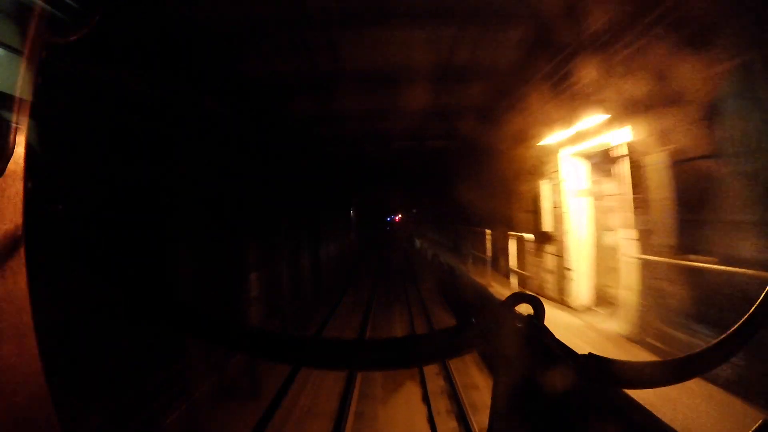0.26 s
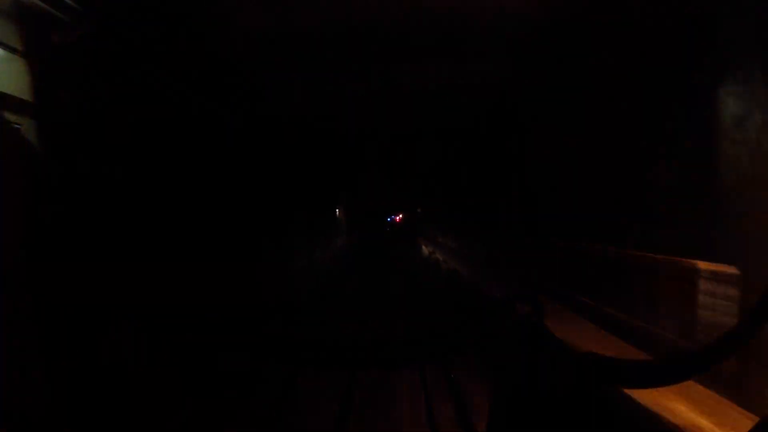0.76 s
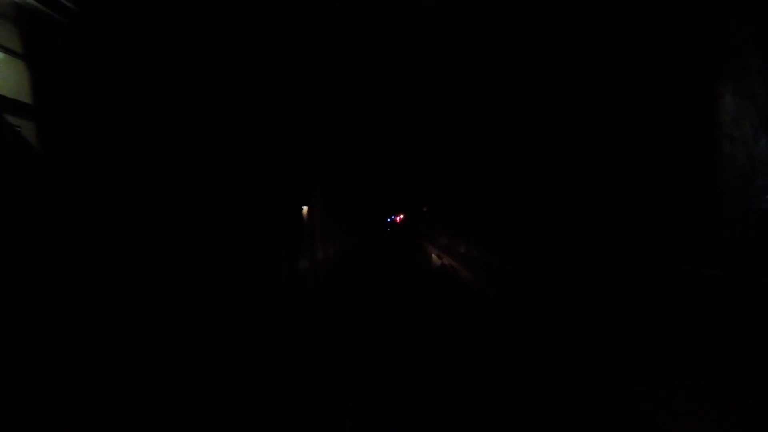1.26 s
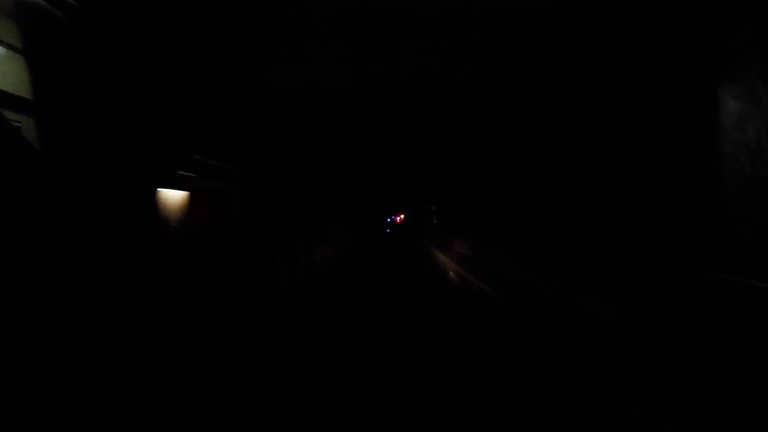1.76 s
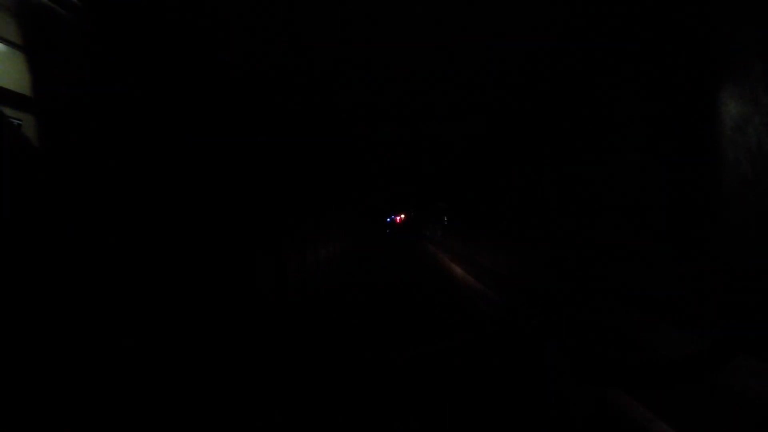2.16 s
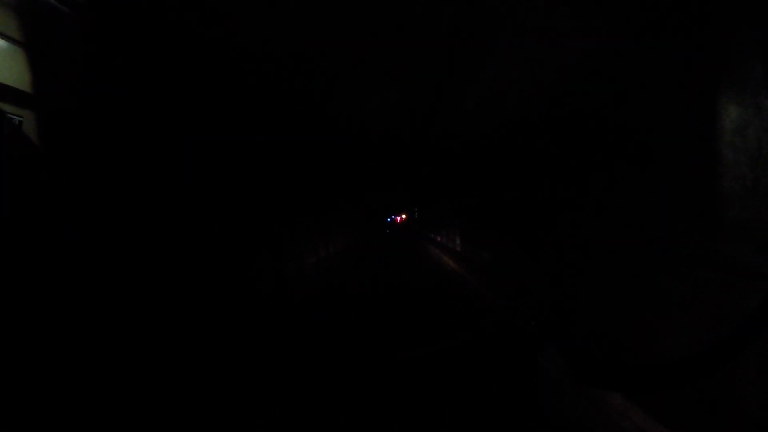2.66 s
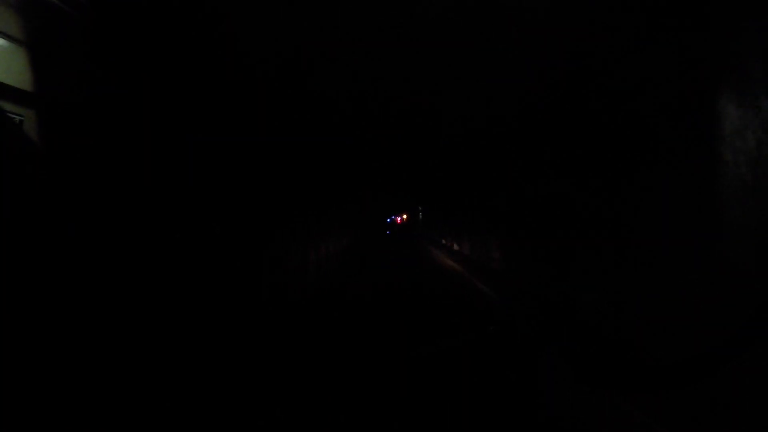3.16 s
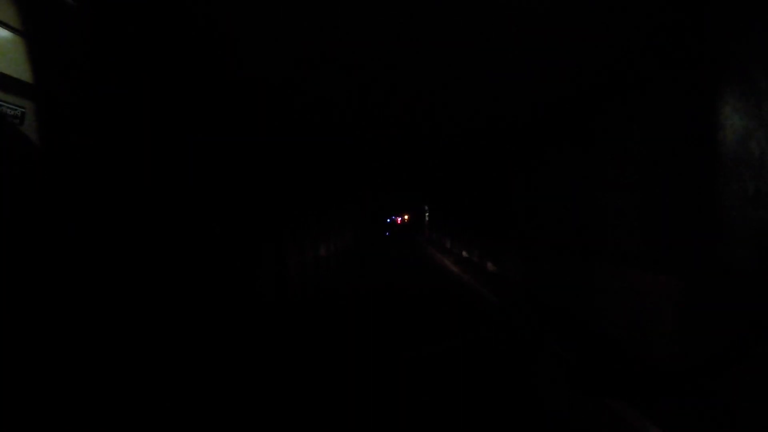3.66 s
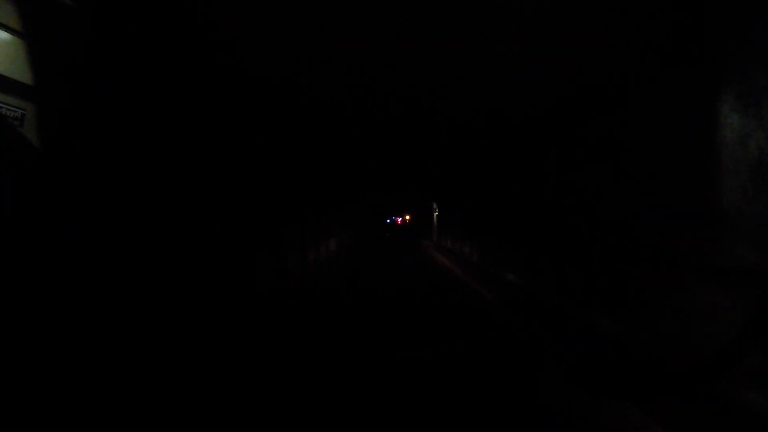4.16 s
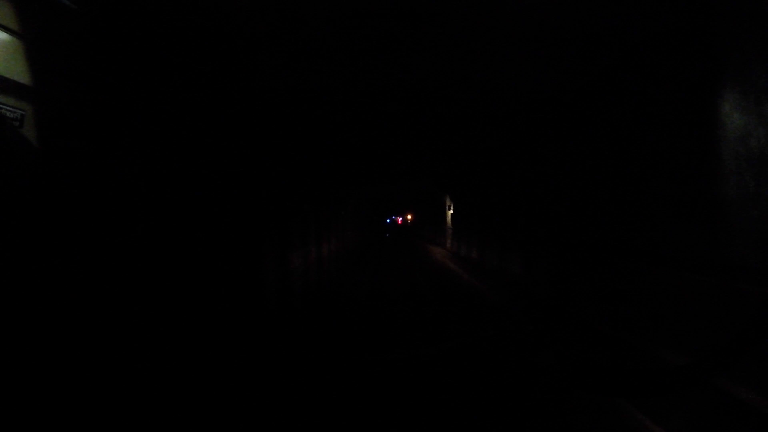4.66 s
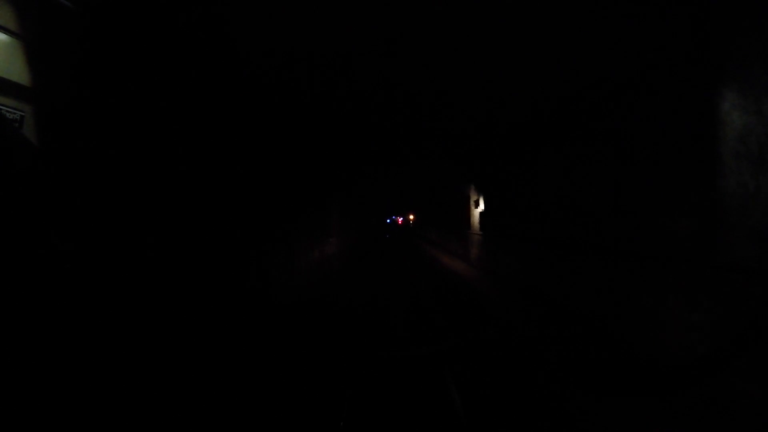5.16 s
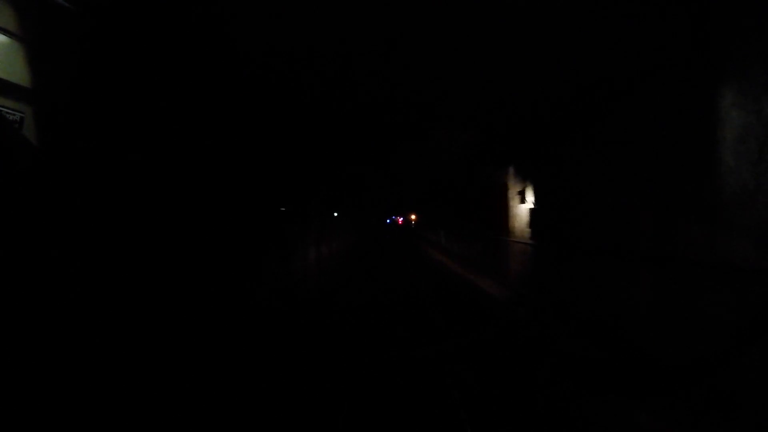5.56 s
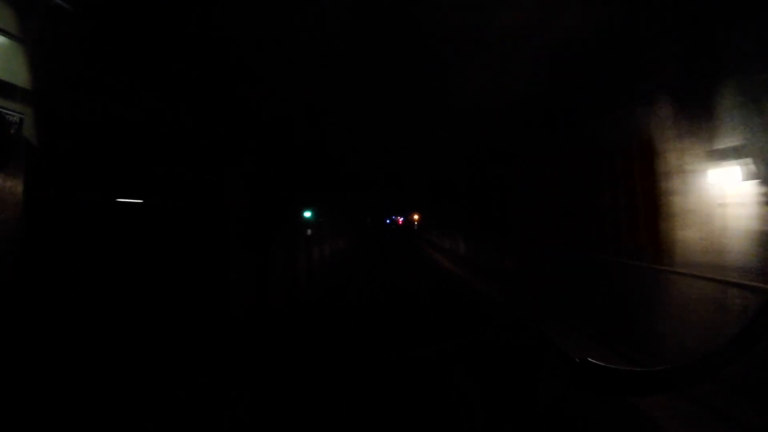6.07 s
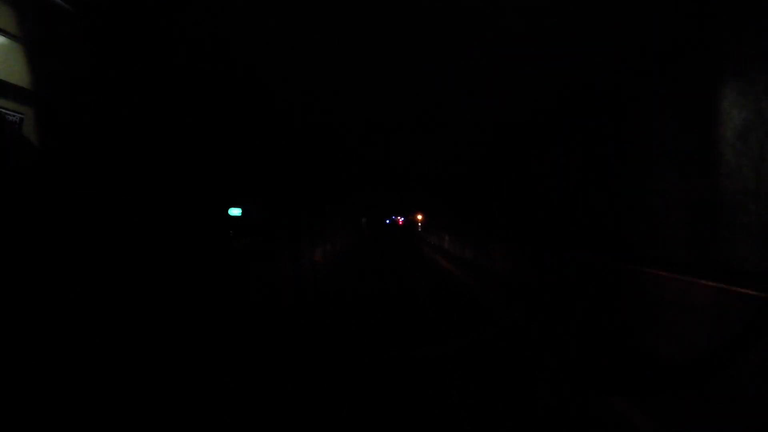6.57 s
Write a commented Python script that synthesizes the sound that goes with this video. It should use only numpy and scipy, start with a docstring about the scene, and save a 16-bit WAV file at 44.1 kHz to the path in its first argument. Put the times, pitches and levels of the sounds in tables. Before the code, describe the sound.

Heard from inside the cab of a subway train speeding up in a tunnel: deep rumble and hollow boom, dull irregular floor thumps, and a thin steady high whine with rising and falling motor tones around it. Wheels clatter heavily over two rail joints midway, then the sliding contact shoe clangs sharply over a gap. The speed then holds, roaring and hissing.

```python
"""The cab of a subway train gathering speed in a tunnel. From the start filtered noise makes the car body
rumble and boom, the wheels roar and the collector shoe hiss; a fixed sine whines at the inverter carrier while
its sidebands fan out with motor speed. Bumps thump, the shoe ticks and scrapes in short bursts. Near 3.1 s and
4.1 s the wheels crash over two rail joints, near 5.3 s the shoe clangs at a gap, and from 5.66 s the speed holds."""
import sys
import numpy as np
from scipy import signal
from scipy.fft import irfft, next_fast_len
from scipy.io import wavfile
from scipy.ndimage import map_coordinates

SR = 44100
rng = np.random.default_rng(int(sys.argv[2]) if len(sys.argv) > 2 else 0)


def transcribe(signal):
    """Save signal, clipped to [-1, 1], as a 16-bit WAV file at the path in sys.argv[1]."""
    frames = np.atleast_2d(signal).T
    limited = np.clip(frames, -1, 1)
    pcm = np.round(limited * 32767).astype(np.int16)
    wavfile.write(sys.argv[1], SR, pcm)


N = 300321
TIME = np.arange(N) / SR  # s

# motor speed, rising steadily and then held: time_s, stator_hz
STATOR_CURVE = [(0, 69.5), (5.66, 116.8), (6.81, 116.8)]
TOP_STATOR_HZ = 116.8
# bumps in the track: start_s, heave_db, panel_db, panel_pitch_hz, boom_db
TRACK_BUMPS = [(0.11, -38, -36, 170.2, -18.5), (0.73, -26.5, -24, 125, -43), (1.19, -24, -31, 125, -30),
               (1.42, -38, -42, 170, -13.5), (1.63, -33, -26, 135, -19.5), (2.22, -42, -29, 235, -19.5),
               (2.55, -28.5, -27, 105, -37), (2.94, -36, -34, 125, -21.5), (3.03, -26, -34, 124.7, -38),
               (3.51, -28, -20.5, 125, -36), (4.03, -25, -29, 90, -28), (4.31, -23, -26, 130, -34),
               (4.38, -30, -22.5, 120, -39), (4.86, -33, -23.5, 85, -28), (4.99, -25.5, -27, 110, -15),
               (5.5, -36, -23, 110, -36), (6.17, -41, -25, 195, -36)]
# one axle over a rail joint: start_s, crash_db, thud_db, rise_s, crash_t60_s
AXLE_BLOWS = [(3.125, -35, -32.5, .08, 1.45), (3.36, -36, -24, .075, 0.95),
              (4.138, -34.5, -25.5, .022, 1.3), (4.355, -36.5, -26, .09, 0.5)]
# spectrum of steel struck at a joint: frequency_hz, density_db (per Hz)
CRASH_SPECTRUM = [(200, -1), (500, 6.5), (900, 3), (1400, -4.5), (2100, -4.5), (3000, -12), (5000, -22.5),
                  (9000, -39)]
# spectrum of the shoe catching or grazing: frequency_hz, density_db (per Hz)
SHOE_SPECTRUM = [(1500, -19.5), (3300, -5), (4150, -8), (4800, 2.5), (5500, 2.5), (6000, -1), (6600, -2),
                 (7400, -7), (8800, -10), (10000, -19)]


def amp(db):
    """Converts decibels to an amplitude ratio."""
    return 10 ** (np.asarray(db) / 20)


def unit(x):
    """Normalizes a signal to rms 1."""
    return x / np.sqrt(np.mean(x ** 2) + 1e-20)


def follow(rows):
    """Linear interpolation: each column of a curve table at every sample."""
    s, *columns = np.transpose(rows)
    return [np.interp(TIME, s, column) for column in columns]


def noise(shape):
    """Spectral shaping: random Fourier coefficients weighted by shape(Hz) give Gaussian noise of rms 1."""
    size = next_fast_len(N)
    hz = np.arange(size // 2 + 1) * SR / size
    coefficients = rng.standard_normal(2 * len(hz)).view(complex)
    return unit(irfft(coefficients * shape(hz), size)[:N])


def coloured(points):
    """Coloured noise: a spectrum given as (Hz, dB), with a further fall of 12 dB per octave above the last point."""
    at, db = np.transpose(points)

    def shape(hz):
        level_db = np.interp(np.log(hz + 1), np.log(at), db)
        return amp(level_db) / np.maximum(hz / at[-1], 1) ** 2

    return noise(shape)


def ring(centre_hz, half_width_hz):
    """Random excitation of a resonance: noise in a narrow band, at half amplitude half_width_hz off centre."""
    return noise(lambda hz: 1 / (1 + ((hz - centre_hz) / half_width_hz) ** 2))


def waver(rate):
    """Smooth random modulation of rms 1: a spline through rate random knots per second."""
    knots = rng.standard_normal(4096)
    coarse = TIME[::16]
    curve = map_coordinates(knots, [coarse * rate], order=2, mode="wrap")
    return unit(np.interp(TIME, coarse, curve))


def burst(s, rise, t60):
    """Exponential decay: a linear climb from s, then a fall of 60 dB in t60 seconds."""
    out = np.zeros(N)
    sounding = slice(*np.searchsorted(TIME, [s, s + rise + 2 * t60]))
    age = TIME[sounding] - s
    decay = np.exp(-np.log(1000) * np.maximum(age - rise, 0) / t60)
    out[sounding] = np.minimum(age / rise, 1) * decay
    return out


def speed_gain(db, db_per_doubling):
    """Power law of speed: the gain is db at top speed and grows with each doubling of speed."""
    stator_hz, = follow(STATOR_CURVE)
    return amp(db + db_per_doubling * np.log2(stator_hz / TOP_STATOR_HZ))


def car_body(sway_db=-27.5, rumble_db=-26.0, boom_db=-26.0, rumble_share=0.24, lurch_db=0.5,
             drumming_db=0.2, rise=0.027, t60=0.42):
    """Forced vibration: uneven track sways the car and drums its floor; the cab booms at its own resonances."""
    # unevenness of the track: time_s, level_db (relative)
    unevenness = [(0, 1), (0.85, 0.8), (2.0, -4.5), (2.8, -3), (3.15, 1.2), (5.1, 1), (6.3, -1),
                  (6.81, -3.5)]
    # spectra of the swaying and of the drumming: frequency_hz, density_db (per Hz)
    sway_spectrum = [(8, -36.5), (16, -0.5), (26, -3), (55, 0.5), (75, -3), (100, -17), (160, -29)]
    rumble_spectrum = [(50, -34.5), (85, -1.5), (120, 1), (190, -1), (240, -4), (300, -2.5), (340, -5),
                       (440, -8), (500, -9), (560, -21), (800, -30.5)]
    # hollow resonances of the cab: centre_hz, half_width_hz, level_db (within the boom)
    cab_modes = [(382.2, 20.6, -9.5), (425, 25, -19), (296, 30, -15.5)]

    track_db, = follow(unevenness)
    bump_heave = sum(amp(db) * burst(s, rise, t60) for s, db, *_ in TRACK_BUMPS)
    bump_boom = sum(amp(db) * burst(s, rise, t60) for s, *_, db in TRACK_BUMPS)
    # bumps and steady motion add in power
    sway = np.hypot(bump_heave, amp(sway_db + track_db + lurch_db * waver(rate=4.9)))
    drumming_level_db = rumble_db + rumble_share * track_db + drumming_db * waver(rate=7.4)
    drumming = speed_gain(drumming_level_db, db_per_doubling=1.5)
    booming = np.hypot(bump_boom, speed_gain(boom_db, db_per_doubling=0.5))
    boom = sum(amp(db) * ring(hz, half_width) for hz, half_width, db in cab_modes)
    return sway * coloured(sway_spectrum) + drumming * coloured(rumble_spectrum) + booming * boom


def floor_thumps(rise=0.038, t60=0.34, wobble_turns=0.11):
    """Damped panel vibration: each bump sets a floor panel ringing in a dull thump of unsteady pitch."""
    out = np.zeros(N)
    for s, _, db, hz, _ in TRACK_BUMPS:
        turns = hz * TIME + rng.random() + wobble_turns * waver(rate=55)
        out += amp(db) * burst(s, rise, t60) * np.sin(2 * np.pi * turns)
    return np.sqrt(2) * out  # levels are rms


def wheels(roar_db=-37.5, ringing_db=-36.0, rough_roar_db=1.57, rough_ringing_db=3.0):
    """Rolling contact: steel on steel roars and rings with speed, more so on rougher rail past the last joint."""
    # spectrum of the rolling roar: frequency_hz, density_db (per Hz)
    roar_spectrum = [(300, -7.5), (520, -2), (600, -3), (750, 0.5), (880, -4.5), (1050, -6.5), (1140, -10),
                     (1500, -10), (1800, -13), (2100, -13.5), (2450, -17.5), (2900, -14), (3500, -20),
                     (4200, -23), (9000, -38.5)]
    rough = TIME > AXLE_BLOWS[-1][0]
    roar = speed_gain(roar_db + rough_roar_db * rough, db_per_doubling=4.5) * coloured(roar_spectrum)
    ringing = speed_gain(ringing_db + rough_ringing_db * rough, db_per_doubling=5) * wheel_ringing()
    return roar + ringing


def wheel_ringing(wander_db=1.1):
    """Modal superposition: each wheel mode waxes and wanes alone as the contact wanders over the tread."""
    # ringing of the wheels: centre_hz, half_width_hz, level_db (relative)
    wheel_modes = [(684, 14, -15), (798, 37, -15.5), (944, 27, -16), (1013, 81, -16.5), (1185, 20, -20.5),
                   (1295, 31, -18), (1434, 43, -23), (1930, 63, -25)]
    out = np.zeros(N)
    for hz, half_width, db in wheel_modes:
        out += amp(db + wander_db * waver(rate=9)) * ring(hz, half_width)
    return out


def rail_joints(thud_t60=1.0, ring_db=2):
    """Impact and reverberation: two axles strike each joint; wheels ring, the bogie rattles, the tunnel smears."""
    # spectrum of the low thud: frequency_hz, density_db (per Hz)
    thud_spectrum = [(15, -20), (40, -5), (80, -13.5), (125, -4), (180, -9), (250, -16.5), (500, -25.5),
                     (1000, -55)]
    crash = sum(amp(db) * burst(s, rise, t60) for s, db, _, rise, t60 in AXLE_BLOWS)
    thud = sum(amp(db) * burst(s, rise, thud_t60) for s, _, db, rise, _ in AXLE_BLOWS)
    ringing = amp(ring_db) * wheel_ringing()
    rattle = unit(amp(2.3 * waver(rate=110)))
    struck_steel = unit(coloured(CRASH_SPECTRUM) + ringing)
    return crash * rattle * struck_steel + thud * coloured(thud_spectrum)


def wheel_blows(rise=0.003, t60=0.13, clatter_hz=1900, clatter_half_width_hz=600, grain_db=2):
    """Impacts: the wheels strike separate hard blows around the joints, and a clattering band swells beneath."""
    # separate blows: start_s, level_db
    blow_times = [(3.167, -36), (3.184, -34), (3.222, -36), (3.42, -38), (4.049, -38), (4.147, -33.5),
                  (4.168, -35.5), (4.235, -35.5), (4.302, -38), (4.433, -35), (4.739, -36), (4.775, -37.5)]
    # swells of the clattering band: start_s, level_db, rise_s, t60_s
    clatter_swells = [(3.06, -45.5, .27, 1.2), (4.1, -48.5, .28, 0.6)]
    blows = sum(amp(db) * burst(s, rise, t60) for s, db in blow_times)
    clatter = sum(amp(db) * burst(s, swell, fade) for s, db, swell, fade in clatter_swells)
    grain = amp(grain_db * waver(rate=150))
    return blows * coloured(CRASH_SPECTRUM) + clatter * grain * ring(clatter_hz, clatter_half_width_hz)


def inverter(carrier_hz=2929.7, carrier_db=2.5, shimmer_db=0.28):
    """Modulation and interference: switching makes the motors sing at the carrier and at sidebands spaced by the
    stator frequency; each sideband swells at a resonance and dips against a near and a far reflection."""
    # carrier whine: time_s, level_db (before carrier_db is added)
    whine_curve = [(0.02, -44.5), (0.28, -40), (0.62, -37.5), (1.56, -41), (1.97, -39.5), (2.48, -43),
                   (2.77, -49.5), (3.2, -43), (3.8, -47.5), (4.05, -45.5), (4.93, -53.5), (5.04, -49.5),
                   (5.66, -54), (6.75, -49)]
    # sidebands, with all Hz on the stator scale: carrier_multiple, stator_multiple, level_db (at resonance,
    # before reflections), resonance_hz, width_hz (full, at half amplitude), near_dip_hz, near_dip_spacing_hz,
    # near_strength (0-1), far_dip_hz, far_dip_spacing_hz, far_strength (0-1)
    sideband_table = [(1, -3, -67.3, 94.0, 47.0, 72.2, 25.6, 0.65, 90.1, 11.1, 0.23),
                      (1.5, -1.5, -65.0, 85.0, 36.0, 90.3, 17.3, 0.2, 88.2, 5.9, 0.22),
                      (1.5, 1.5, -54.5, 93.0, 63.0, 75.9, 46.3, 0.33, 92.7, 8.9, 0.14),
                      (1.5, 4.5, -57.7, 106.0, 15.0, 104.6, 46.6, 0.85, 98.7, 11.2, 0.33),
                      (2, -4, -62.3, 125.0, 69.0, 100.6, 38.9, 0.33, 94.4, 13.0, 0.43),
                      (2, -3, -59.8, 70.0, 87.0, 85.5, 50.0, 0.44, 98.9, 14.0, 0.35),
                      (2, -2, -65.6, 71.0, 120.0, 80.6, 42.9, 0.62, 97.9, 5.7, 0.2),
                      (2, -1, -61.6, 95.0, 45.0, 78.1, 21.8, 0.42, 95.7, 12.7, 0.31),
                      (2, 0, -64.1, 97.0, 25.0, 99.0, 32.5, 0.85, 96.5, 14.0, 0.4),
                      (2, 1, -65.5, 95.0, 31.0, 73.6, 28.7, 0.54, 92.4, 7.4, 0.4),
                      (2, 2, -68.9, 86.0, 32.0, 83.8, 30.9, 0.62, 85.1, 10.0, 0.36),
                      (2, 3, -59.4, 70.0, 103.0, 90.3, 21.9, 0.35, 87.9, 12.0, 0.2),
                      (2, 4, -66.3, 125.0, 81.0, 97.2, 25.2, 0.45, 89.4, 12.6, 0.28),
                      (2, 6, -55.3, 113.0, 12.0, 83.5, 14.0, 0.52, 93.1, 10.9, 0.69),
                      (2.5, -4.5, -58.1, 101.0, 36.0, 88.6, 17.7, 0.37, 92.5, 9.9, 0.28),
                      (2.5, -1.5, -59.4, 125.0, 92.0, 76.1, 50.0, 0.64, 94.4, 8.3, 0.15),
                      (2.5, 0.5, -63.9, 106.0, 45.0, 70.4, 50.0, 0.58, 90.8, 8.5, 0.08),
                      (2.5, 1.5, -63.6, 103.0, 36.0, 101.7, 22.7, 0.47, 91.4, 9.2, 0.47),
                      (2.5, 4.5, -58.3, 95.0, 41.0, 88.8, 24.5, 0.25, 94.8, 9.0, 0.21),
                      (2.5, 7.5, -60.3, 110.0, 12.0, 106.6, 15.9, 0.42, 95.5, 8.1, 0.39),
                      (3, -6, -55.1, 119.0, 41.0, 73.5, 19.4, 0.19, 89.8, 13.9, 0.25),
                      (3, -3, -65.0, 94.0, 50.0, 94.4, 50.0, 0.85, 89.4, 7.6, 0.23)]

    stator_hz, = follow(STATOR_CURVE)
    whine_db, = follow(whine_curve)
    carrier_turns = carrier_hz * TIME
    stator_turns = np.cumsum(stator_hz) / SR
    whine_gain = amp(whine_db + carrier_db + shimmer_db * waver(rate=40))
    out = whine_gain * np.sin(2 * np.pi * carrier_turns)
    for m, k, db, best_hz, width, *paths in sideband_table:
        swell = amp(db) / (1 + (2 * (stator_hz - best_hz) / width) ** 2)  # sweeping past a resonance
        for dip_hz, dip_step_hz, reflection in (paths[:3], paths[3:]):
            lag_turns = (stator_hz - dip_hz) / dip_step_hz
            interference = 1 + reflection ** 2 - 2 * reflection * np.cos(2 * np.pi * lag_turns)
            swell = swell * np.sqrt(interference)
        fading = amp(1.4 * waver(rate=7))
        turns = m * carrier_turns + k * stator_turns + rng.random()
        out += swell * fading * np.sin(2 * np.pi * turns)
    return np.sqrt(2) * out  # levels are rms


def shoe_hiss(flutter_db=0.5):
    """Sliding friction: the collector shoe hisses on the live rail, its level following a curve over time."""
    # level of the hiss: time_s, level_db
    hiss_curve = [(0, -51.5), (1.0, -58), (1.9, -53.5), (2.25, -52.5), (2.78, -55), (3.2, -49), (3.9, -51),
                  (4.3, -47.5), (4.6, -48.5), (5.2, -48), (5.5, -46), (6.8, -47)]
    # spectrum of the hiss: frequency_hz, density_db (per Hz)
    hiss_spectrum = [(2500, -16.5), (4350, -9), (4800, -2.5), (5100, -1), (5400, -1.5), (5950, -10),
                     (6480, -0.5), (7000, -6.5), (7800, -9.5), (8750, -10.5), (9150, -20.5), (9600, -27.5)]
    level_db, = follow(hiss_curve)
    return amp(level_db + flutter_db * waver(rate=40)) * coloured(hiss_spectrum)


def shoe_ticks(tick_db=-9.3, rise=0.0018, t60=0.06, echo_db=-13, echo_t60=0.3, chatter_db=1.0):
    """Stick-slip: the shoe catches and chatters briefly, brighter or duller; the walls add a weaker, longer tail."""
    # ticks: start_s, level_db (before tick_db is added), tilt_db_per_octave (positive is brighter)
    tick_table = [(0.2947, -37.5, 2), (0.6065, -39.5, -2), (0.6903, -40, 0), (1.1613, -28, 1),
                  (1.442, -40.5, -3), (1.816, -33, -5), (1.908, -35, -3), (2.82, -29, -1),
                  (3.3463, -29.5, 0), (3.4416, -32, -3), (4.0682, -28.5, 1), (4.402, -34, -1),
                  (4.4435, -31.5, 0), (5.3512, -32, -6), (6.0681, -29.5, -1)]
    out = np.zeros(N)
    for s, db, tilt in tick_table:
        colour = [(hz, level_db + tilt * np.log2(hz)) for hz, level_db in SHOE_SPECTRUM]
        envelope = burst(s, rise, t60) + amp(echo_db) * burst(s, rise, echo_t60)
        out += amp(db + tick_db) * envelope * coloured(colour)
    return out * amp(chatter_db * waver(rate=610))


def shoe_scrapes(half_width_hz=170, grain_db=0.6):
    """Friction-driven resonance: longer, smooth grazes of the shoe each ring one of its modes."""
    # scrapes: start_s, level_db, rise_s, t60_s, ring_hz, ring_db (against the scrape)
    scrape_table = [(1.38, -54, 0.044, 0.45, 6300, -14), (1.68, -61, 0.017, 0.22, 8370, 7),
                    (2.06, -49, 0.037, 0.56, 6580, 3), (2.15, -50, 0.027, .3, 6640, 1),
                    (2.96, -60, .05, 0.94, 5600, -3), (4.41, -60, 0.032, 0.95, 6360, 10)]
    grit = coloured(SHOE_SPECTRUM)
    out = np.zeros(N)
    for s, db, rise, t60, hz, ring_db in scrape_table:
        mode = amp(ring_db) * ring(hz, half_width_hz)
        out += amp(db) * burst(s, rise, t60) * (grit + mode)
    return out * amp(grain_db * waver(rate=180))


def shoe_clang(gap_s=5.337, slap_s=5.3512, scrape_rise=0.011, slap_rise=0.004):
    """Free decay of modes: past a gap the shoe scrapes onto the next rail, slaps down and rings in damped sines."""
    # modes at the gap: centre_hz, half_width_hz (scrape only), scrape_db, slap_db (peak), t60_s
    clang_modes = [(2770, 120, -52, -50, 0.15), (3400, 400, -45.5, -46, 0.13), (4700, 70, -49, -43, 0.22),
                   (5070, 160, -43, -48, 0.55), (5400, 90, -54, -49, 0.32), (6440, 650, -46.5, -49, 0.34),
                   (8390, 650, -45.5, -48, 0.34)]
    out = np.zeros(N)
    for hz, half_width, scraped_db, struck_db, t60 in clang_modes:
        out += amp(scraped_db) * burst(gap_s, scrape_rise, t60) * ring(hz, half_width)
        tone = np.sin(2 * np.pi * (hz * TIME + rng.random()))
        out += amp(struck_db) * burst(slap_s, slap_rise, t60) * tone
    return out


def scene():
    """Superposition: every source adds linearly at the listener in the cab."""
    body = car_body() + floor_thumps()
    running_gear = wheels() + rail_joints() + wheel_blows()
    shoe = shoe_hiss() + shoe_ticks() + shoe_scrapes() + shoe_clang()
    return (body + running_gear + inverter() + shoe)[None]


def record(dry, cutoff_hz=9400, fade_s=0.002):
    """Band limiting: a linear-phase lowpass removes the top treble, and short ramps soften both ends."""
    lowpass = signal.firwin(301, cutoff_hz, window=("kaiser", 8), fs=SR)
    ends = np.minimum(np.minimum(TIME, TIME[::-1]) / fade_s, 1)
    return signal.oaconvolve(dry, lowpass[None], "same") * ends


dry = scene()
out = record(dry)
transcribe(out)
```